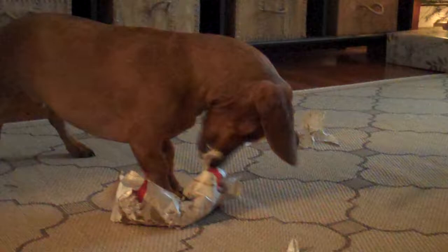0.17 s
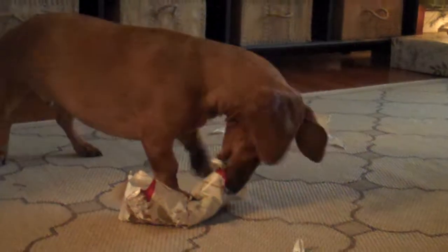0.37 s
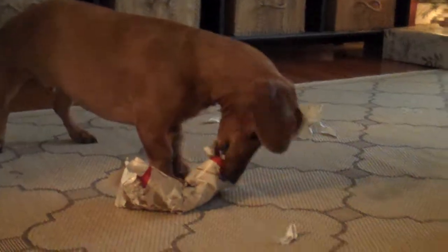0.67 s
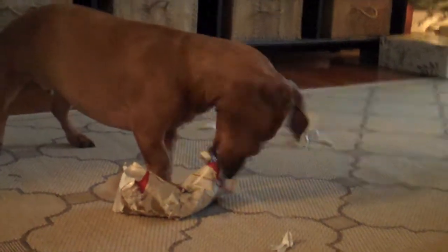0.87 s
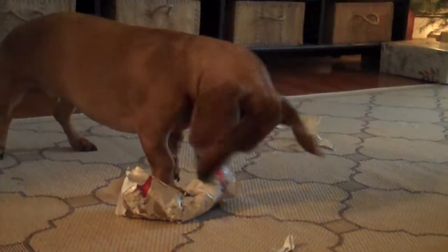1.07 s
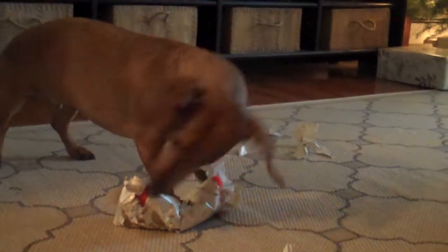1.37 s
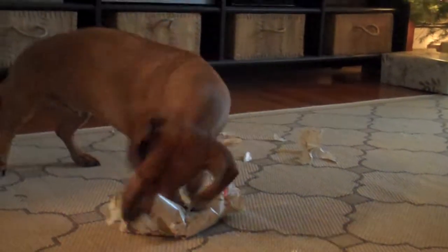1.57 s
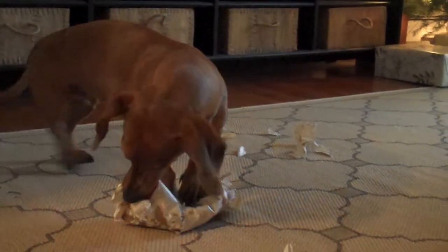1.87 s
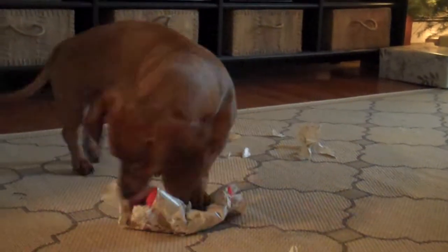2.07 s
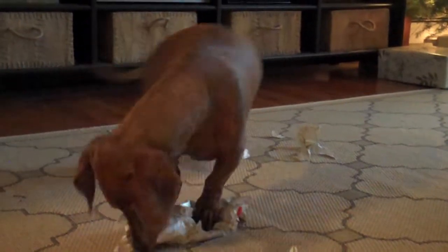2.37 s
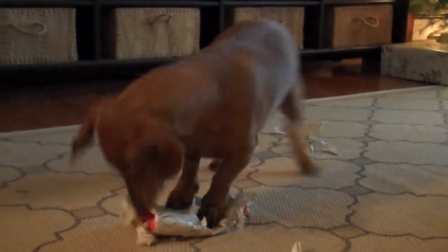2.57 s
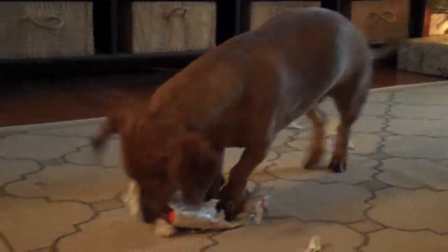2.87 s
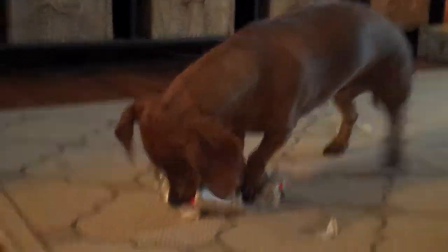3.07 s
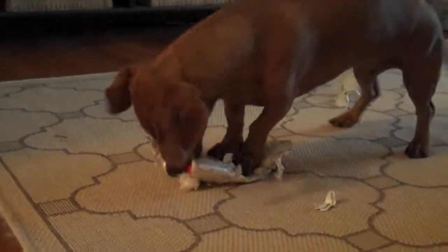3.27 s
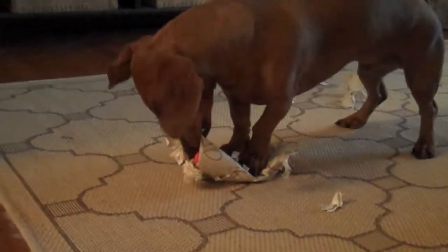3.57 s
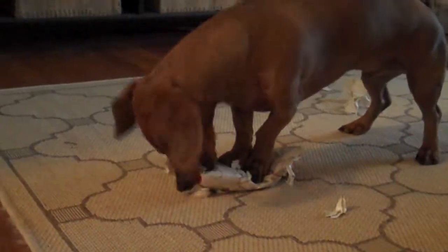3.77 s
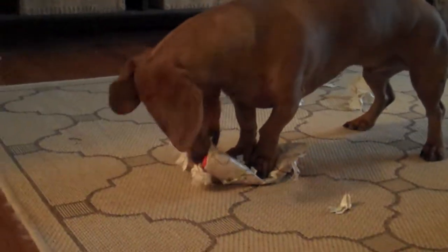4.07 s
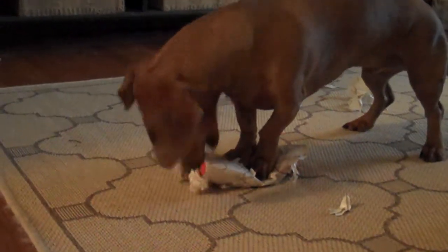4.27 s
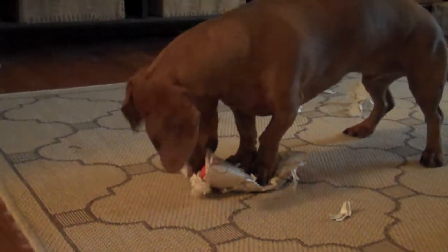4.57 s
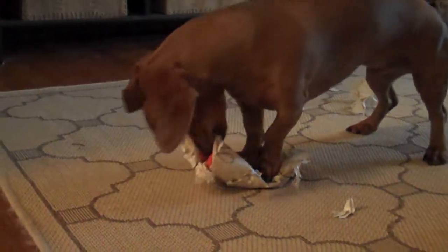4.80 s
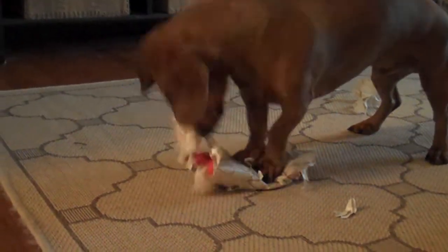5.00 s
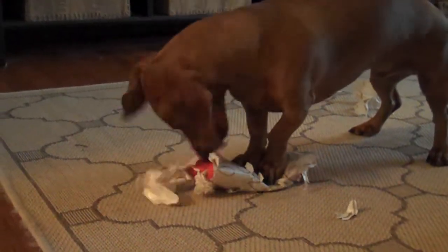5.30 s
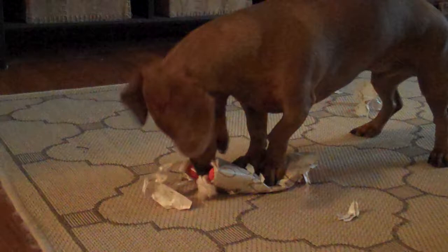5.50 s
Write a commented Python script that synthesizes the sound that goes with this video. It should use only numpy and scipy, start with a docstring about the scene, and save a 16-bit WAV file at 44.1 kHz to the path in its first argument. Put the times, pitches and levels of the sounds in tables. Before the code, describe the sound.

Stiff paper crumples and rips under a dog's teeth and paws, very near the microphone in a small furnished room. Light nibbling rustles come first with pauses, then hard crease pops and fibrous tears. Busy, irregular tugging continues through the middle, the loudest jerk comes near the end with a dull knock on the rug, and weak crinkles finish over quiet hiss.

```python
"""Small dog and wrapped parcel

Living room, one microphone, close: the paper stands well above the room's echoes.
The dog pins the parcel on a rug and works at it with teeth and paws. The sheet crumples in bursts
of tiny buckles, and its fibres crackle as strips rip away: both are streams of short random clicks.
Stiff creases snap as a crack plus a ringing panel, nicks only crack, and jerks thump on the rug.
Short echoes and a decaying noise tail make the room; shaped noise makes its floor and the hiss."""
import sys
import numpy as np
from scipy import signal
from scipy.fft import rfft, irfft
from scipy.io import wavfile
from scipy.ndimage import uniform_filter1d

SR = 44100
rng = np.random.default_rng(int(sys.argv[2]) if len(sys.argv) > 2 else 0)


def persist_wave(psi):
    """Save psi, clipped to +-1, as 16-bit WAV."""
    counts = np.round(np.clip(psi, -1, 1) * 32767).astype(np.int16)
    wavfile.write(sys.argv[1], SR, np.atleast_2d(counts).T)


N = 248718  # length in samples

# still room and microphone hiss: [f/Hz, relative level/dB per Hz]
FLOOR_COLOUR = [(10, 15.5), (22, -28), (35, -5), (60, -8), (120, -10.5), (280, -12.5), (550, -9.5),
                (1200, -9), (4000, -17.5), (14000, -20)]
# reverberation of the living room: [f/Hz, time to fall 60 dB t/s]
ROOM_DECAY = [(200, 0.14), (800, 0.46), (2100, 0.51), (5500, 0.39), (13000, 0.097)]
# jerks that knock the parcel on the rug: [t/s, envelope peak level/dB, f/Hz, swell time t/s]
RUG_THUMPS = [(1.977, -49, 313, 0.0027), (2.606, -41.5, 206, 0.001), (2.701, -56, 174, 0.0012),
              (5.025, -44, 160, 0.00051), (5.068, -41, 120, 0.00061)]
# creases that pop through, before the bass cut: [t/s, ring envelope peak level/dB, panel f/Hz,
# cycles until the ring peaks, crack energy level/dB, top of the crack f/Hz]
CREASE_SNAPS = [(0.7552, -32, 1030, 0.46, -33, 6900), (0.7951, -32, 1350, 0.42, -46, 2500),
                (1.0974, -28, 2530, 0.62, -18, 7550), (1.19, -28, 920, .45, -21, 4300),
                (1.2056, -38.5, 1790, 1.1, -31, 4700), (1.2572, -28.5, 1320, 0.86, -19.5, 14100),
                (1.3117, -40, 1650, 2.2, -31.5, 3600), (1.6628, -35, 816, 0.36, -33, 6200),
                (1.8834, -51, 1170, .45, -24, 6800), (1.9126, -17.5, 1040, 0.54, -8, 2690),
                (2.0579, -32, 2720, 0.3, -29.5, 6200), (2.2082, -36.5, 1070, 0.44, -20.5, 3300),
                (2.2817, -36, 2370, 1.1, -21, 6070), (2.336, -16, 1900, 0.3, -11, 3340),
                (2.3637, -28.5, 1450, 0.34, -23, 6200), (2.3773, -37, 2170, .5, -25, 14000),
                (2.4411, -40, 1430, 0.28, -23, 5170), (2.535, -37.5, 2720, 0.65, -28.5, 8900),
                (2.6019, -34, 1030, .35, -26, 4700), (2.609, -21.5, 2240, 0.33, -9, 14100),
                (3.2695, -33.5, 2480, 0.82, -23, 7440), (3.3782, -31, 2280, 0.38, -23, 5160),
                (3.3943, -32, 1450, .3, -23, 3900), (3.4351, -23, 2000, 0.54, -27, 11700),
                (3.4646, -24.5, 1660, 0.31, -28, 7400), (3.4728, -25, 2050, 0.26, -20.5, 5700),
                (4.1329, -29.5, 740, 0.46, -14.5, 11700), (4.1954, -31, 800, .5, -18.5, 8900),
                (4.4932, -33, 3500, 0.74, -28, 7400), (4.5782, -31.5, 1430, 1.1, -26, 3960),
                (4.8945, -28, 2390, 0.47, -24.5, 14000), (5.0245, -26.5, 810, 0.51, -7.5, 7000),
                (5.0271, -20, 1010, .35, -18, 5200)]
# teeth nick the taut edge, a bright spray with no ring, before the bass cut: [t/s, energy level/dB]
EDGE_NICKS = [(0.7617, -24.5), (1.1918, -25), (1.381, -32.5), (1.529, -26.5), (1.6066, -12.5),
              (2.1035, -23.5), (2.1495, -15.5), (2.7032, -14), (2.8335, -18), (3.007, -21.5),
              (3.048, -16.5), (3.0722, -14.5), (3.7602, -19.5), (3.8995, -20), (4.1465, -19.5),
              (4.3086, -14.5), (4.4507, -21), (5.0706, -8.5), (5.1535, -17), (5.228, -28.5), (5.614, -29)]
# colour of the buckling sheet: [f/Hz, relative level/dB per Hz]
BUCKLE_COLOUR = [(100, -35.5), (220, -20), (380, -5.5), (520, -3.5), (720, 0.5), (1000, -2), (1400, 0.5),
                 (2400, -4.5), (3500, -9), (6000, -17), (14000, -29)]
# colour of breaking fibres: [f/Hz, relative level/dB per Hz]
FIBRE_COLOUR = [(120, -54), (400, -24), (900, -15.5), (2500, -0.5), (4500, -3.5), (6300, -0.5), (7500, -6),
                (10000, -5.5), (12700, 1), (14000, -8)]
# bites, tugs and paw strokes, nominal levels: [start t/s, rise t/s, hold t/s, crumpling level/dB,
# tearing level relative to the crumpling/dB]
PAPER_TUGS = [(0.047, 0.023, 0.0087, -62, -15), (0.12, 0.052, 0.032, -62.5, -7),
              (0.244, 0.013, 0.0083, -55, -12.5), (0.294, 0.028, 0.041, -67.5, -1),
              (0.465, 0.018, 0.015, -51, -6.5), (0.54, 0.033, 0.055, -65, -7.5),
              (0.665, 0.045, 0.055, -65, -8), (0.724, 0.027, 0.019, -49.5, -13.5),
              (0.802, .02, 0.083, -64.5, -18), (0.981, 0.086, 0.097, -67, 1.5),
              (1.177, 0.011, 0.077, -56.5, -16), (1.473, 0.0081, 0.066, -63, -0.5),
              (1.548, 0.028, .02, -57, -1), (1.613, .02, 0.013, -53.5, 2), (1.651, 0.036, .012, -45, -8),
              (1.73, 0.041, .1, -58.5, -3), (1.819, 0.066, 0.041, -51.5, -4),
              (1.955, 0.018, 0.0068, -52.5, -7), (2.111, 0.021, 0.027, -52.5, -3.5),
              (2.168, 0.018, .05, -66, 1.5), (2.251, 0.03, 0.056, -50.5, -6.5),
              (2.309, 0.028, 0.097, -47.5, -6.5), (2.521, .015, 0.0086, -54.5, -7),
              (2.566, 0.034, 0.017, -46.5, -2.5), (2.621, .01, 0.029, -43.5, 8),
              (2.676, 0.021, .006, -44.5, 5), (2.745, 0.037, 0.057, -56, 2.5),
              (2.866, 0.033, 0.15, -62.5, 3.5), (2.994, 0.017, 0.053, -54, 3),
              (3.182, 0.041, 0.055, -55.5, -3.5), (3.323, 0.12, 0.056, -47, -7),
              (3.531, 0.024, 0.016, -43, -3.5), (3.706, 0.042, 0.096, -53, -6.5),
              (3.897, 0.033, 0.014, -46, 3), (3.96, .02, 0.09, -56, 2.5), (4.067, 0.035, 0.048, -53, -5.5),
              (4.18, .015, 0.011, -48, -7), (4.235, 0.056, 0.032, -48.5, -4),
              (4.337, 0.033, 0.087, -55.5, -3.5), (4.48, 0.038, 0.019, -52.5, 5),
              (4.559, .01, 0.032, -50, -15), (4.617, 0.013, 0.012, -47.5, -1.5),
              (4.687, 0.029, 0.019, -60.5, 8), (4.762, 0.023, 0.018, -52, 0.5),
              (4.863, 0.019, 0.01, -53.5, 0), (4.925, 0.04, 0.024, -60, 5), (5.012, 0.011, 0.045, -40, 3.5),
              (5.108, .015, 0.011, -53.5, 4.5), (5.301, 0.019, 0.04, -63.5, -0.5),
              (5.373, 0.027, 0.0089, -62, -3.5), (5.458, 0.0093, .02, -60, -14),
              (5.57, 0.035, .01, -56.5, -8), (5.617, 0.0065, 0.009, -46, -13)]

NICK_TOP_HZ = 15300
# small creases pop by chance, as loud as the crumpling around them allows
SMALL_PER_S, SMALL_RING_DB, SMALL_CRACK_DB, SMALL_SPREAD_DB = 28, 11.5, 22.5, 3.5
SMALL_LIMIT_DB = -48  # above this crumpling level they grow no louder
SMALL_HZ, SMALL_OCTAVES, SMALL_CYCLES, SMALL_TOP_RATIO = 1910, 0.39, 0.42, 3.4
LET_GO_DB_PER_S = 271  # the sheet settles after each tug
IDLE_DB, IDLE_TEAR_DB = -79.5, -76.5  # the paper stirs under the paws between tugs
EDGE_HZ = 14050  # upper band limit of the recorder


def amp(db):
    """Decibels to gain."""
    return 10 ** (np.asarray(db) / 20)


def evened(x):
    """Scales to an rms of one."""
    return x / np.sqrt(np.mean(x ** 2) + 1e-20)


def read(points, hz):
    """Reads a table on a log-frequency axis."""
    f, value = np.transpose(points)
    return np.interp(np.log(hz + 1), np.log(f + 1), value)


def add(mix, s, sound):
    """Mixes a sound in at a time in seconds."""
    part = mix[max(round(s * SR), 0):][:len(sound)]
    part += sound[:len(part)]


def click(colour, uneven_db, width_hz, size=1024):
    """A sharp click of unit energy with the given colour and chance resonances of its own."""
    hz = np.fft.rfftfreq(size, 1 / SR)
    # resonances lie wider apart towards the treble
    knots = np.cumsum(width_hz * 1.1 ** np.arange(40)) - width_hz
    resonances_db = uneven_db * np.interp(hz, knots, rng.standard_normal(len(knots)))
    db = read(colour, hz) + resonances_db
    # folding the cepstrum gives minimum phase: nothing sounds before the break
    cepstrum = irfft(np.log(amp(db)))
    cepstrum[1:size // 2] *= 2
    cepstrum[size // 2 + 1:] = 0
    wave = irfft(np.exp(rfft(cepstrum)))
    return wave / np.linalg.norm(wave)


def floor(db):
    """Faint steady rumble and hiss: Gaussian noise shaped in frequency."""
    colour = amp(read(FLOOR_COLOUR, np.fft.rfftfreq(N, 1 / SR)))
    noise = irfft(rfft(rng.standard_normal(N)) * colour, N)
    return amp(db) * evened(noise)


def echoes(early_db, tail_db, count=14):
    """A few echoes from floor and furniture, and a diffuse tail that decays at its own rate per band."""
    t = np.arange(SR // 2) / SR
    hz, frame_t, bands = signal.stft(rng.standard_normal(len(t)), SR, nperseg=256)
    decay = amp(-60 * frame_t / read(ROOM_DECAY, hz)[:, None])
    tail = signal.istft(bands * decay, SR, nperseg=256)[1][:len(t)]
    tail *= np.clip((t - .002) / 0.0013, 0, 1)  # fades in after 2 ms
    early = np.zeros(len(t))
    arrivals = (rng.uniform(.0015, .014, count) * SR).astype(int)
    early[arrivals] = rng.choice([-1, 1], count) / np.sqrt(count)
    return amp(early_db) * early + amp(tail_db) * tail / np.linalg.norm(tail)


def room(x, early_db, tail_db, count=3):
    """Echo paths change as the dog's head and the paper move: a steady turn reweights echo patterns."""
    turn = 2 * np.pi * 1.3 * np.arange(N) / SR  # 1.3 turns per second
    out = np.zeros(N)
    for k in range(count):
        share = np.sqrt(2 / count) * np.cos(turn + np.pi * k / count)
        out += signal.oaconvolve(x * share, echoes(early_db, tail_db))[:N]
    return out


def thumps():
    """Soft low pushes, damped at once by the rug: sines that swell and die away."""
    out, t = np.zeros(N), np.arange(2048) / SR
    for s, db, hz, swell_s in RUG_THUMPS:
        envelope = t / swell_s * np.exp(1 - t / swell_s)
        add(out, s, amp(db) * envelope * np.sin(2 * np.pi * hz * t))
    return out


def crack(top_hz, sharp_db, splinter_s):
    """One sharp break, then a few milliseconds of weaker splinters; unit energy."""
    t = np.arange(1024) / SR
    hz = np.geomspace(100, 14000, 30)
    splinters = rng.standard_normal(len(t)) * np.exp(-t / splinter_s)
    splinters[0] = amp(sharp_db) * np.linalg.norm(splinters)  # the first break
    bass_loss = 1 + (900 / hz) ** 4
    treble_loss = (1 + (hz / top_hz) ** 4) * (1 + hz / 14000)
    colour_db = -10 * np.log10(bass_loss * treble_loss)
    body = click(np.c_[hz, colour_db], uneven_db=5.0, width_hz=351)
    wave = signal.fftconvolve(splinters, body)
    return wave / np.linalg.norm(wave)


def small_snaps(crumple_db, count=300):
    """Rows like those of CREASE_SNAPS for the small creases that give way by chance."""
    when, chance = rng.random((count, 2)).T
    size, panel = rng.standard_normal((count, 2)).clip(-2, 2).T
    crumple_then_db = crumple_db[(when * N).astype(int)]
    db = np.minimum(crumple_then_db, SMALL_LIMIT_DB) + SMALL_SPREAD_DB * size
    hz = SMALL_HZ * 2 ** (SMALL_OCTAVES * panel)
    cycles = np.full(count, SMALL_CYCLES)
    rows = np.c_[when * N / SR, db + SMALL_RING_DB, hz, cycles, db + SMALL_CRACK_DB, SMALL_TOP_RATIO * hz]
    return list(rows[chance < SMALL_PER_S * N / SR / count])


def snaps(crumple_db):
    """A crease cracks briefly and the panel beside it swings for a few cycles; a nick only cracks."""
    out, t = np.zeros(N), np.arange(1024) / SR
    for s, db in EDGE_NICKS:
        add(out, s, amp(db) * crack(NICK_TOP_HZ, sharp_db=-4, splinter_s=0.0022))
    creases = list(CREASE_SNAPS) + small_snaps(crumple_db)
    for s, db, panel_hz, cycles, crack_db, top_hz in creases:
        swell = t * panel_hz / cycles
        ring = swell * np.exp(1 - swell) * np.sin(2 * np.pi * panel_hz * t)
        add(out, s, amp(db) * ring)
        add(out, s + 0.00019, amp(crack_db) * crack(top_hz, sharp_db=-4.7, splinter_s=0.0017))
    # small panels of paper radiate little bass
    return signal.sosfilt(signal.butter(3, 420, "highpass", fs=SR, output="sos"), out)


def work():
    """Nominal levels of crumpling and tearing in dB: each tug builds, holds and lets go."""
    t = np.arange(N) / SR
    crumple_power = np.full(N, amp(IDLE_DB) ** 2)
    tear_power = np.full(N, amp(IDLE_TEAR_DB) ** 2)
    age = t[:SR // 2]
    for start, rise, hold, db, tear_db in PAPER_TUGS:
        let_go_s = np.maximum(age - rise - hold, 0)
        pull = np.minimum(age / rise, 1) * amp(db - LET_GO_DB_PER_S * let_go_s)
        add(crumple_power, start, pull ** 2)
        add(tear_power, start, (pull * amp(tear_db)) ** 2)
    return 10 * np.log10(crumple_power), 10 * np.log10(tear_power)


def slips(per_s, relax_s):
    """Stick and slip: each slip sets off a flurry of breaks that dies away. Mean zero, rms one."""
    kicks = (rng.random(N) < per_s / SR) * rng.uniform(0.33, 1, N)
    flurry = np.tanh(signal.lfilter([1], [1, -np.exp(-1 / (relax_s * SR))], kicks))
    return evened(flurry - flurry.mean())


def grains(level_db, per_s, spread_db, colour, uneven_db, width_hz, count=150):
    """Countless small breaks of uneven size, each at one of many spots with its own ring."""
    happens = rng.random(N) < per_s / SR
    size = amp(spread_db * np.minimum(rng.exponential(1, N), 3.2)) * happens
    # the breaks share the work of the moment, some 20 ms
    size /= np.sqrt(abs(uniform_filter1d(size ** 2, size=900)) + 1e-6)
    size *= amp(level_db) * rng.choice([-1, 1], N)
    rings = [click(colour, uneven_db, width_hz) for _ in range(count)]
    spot, out = rng.integers(0, count, N), np.zeros(N)
    for i in np.flatnonzero(size):
        add(out, i / SR, size[i] * rings[spot[i]])
    return out


def paper(crumple_db, tear_db):
    """Buckles and breaking fibres; the harder the pull, the thicker they come."""
    unsteady = np.interp(tear_db, [-54, -42], [1, .45])  # a running rip is steadier than nibbling
    flurry_db = 2.9 * unsteady * slips(per_s=72, relax_s=0.01)
    buckles_per_s = 900 * amp(.45 * (crumple_db + 51.0))
    fibres_per_s = 1900 * amp(0.55 * (tear_db + 51))
    buckles = grains(crumple_db + flurry_db - .8, buckles_per_s, spread_db=-2.0,
                     colour=BUCKLE_COLOUR, uneven_db=1, width_hz=177.6)
    fibres = grains(tear_db + flurry_db + 1.56, fibres_per_s, spread_db=-1.0,
                    colour=FIBRE_COLOUR, uneven_db=6.0, width_hz=297)
    return buckles + fibres


def scene():
    """The parcel on the rug, heard in the room."""
    crumple_db, tear_db = work()
    parcel = paper(crumple_db, tear_db) + snaps(crumple_db) + thumps()
    reverberation = room(parcel, early_db=-13.0, tail_db=-11.5)
    return (parcel + reverberation + floor(db=-63))[None]


def record(dry):
    """The recorder's steep band limit."""
    lowpass = signal.firwin(401, EDGE_HZ, window=("kaiser", 8), fs=SR)
    return signal.oaconvolve(dry, lowpass[None], "same")


dry = scene()
out = record(dry)
persist_wave(out)
```